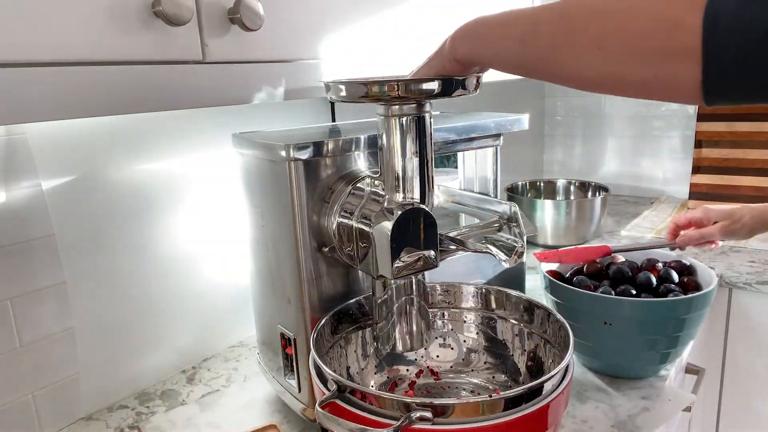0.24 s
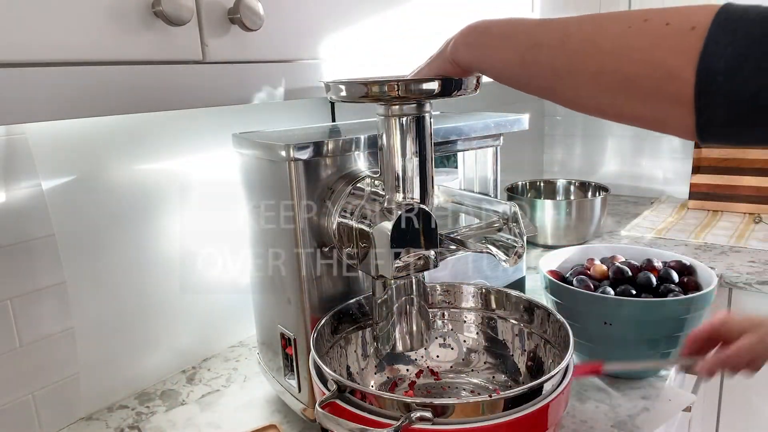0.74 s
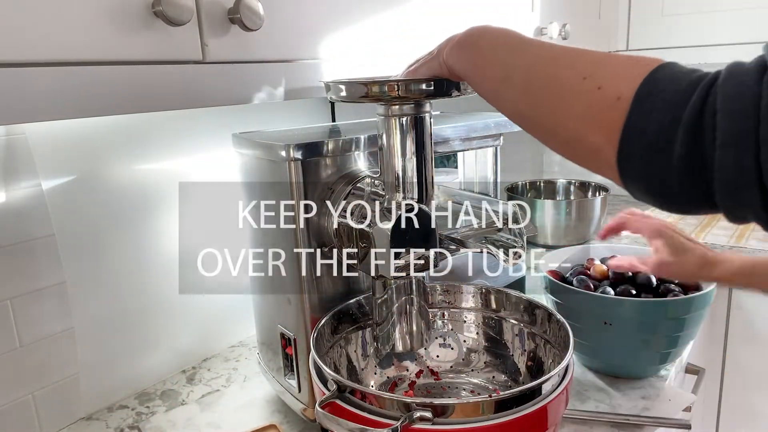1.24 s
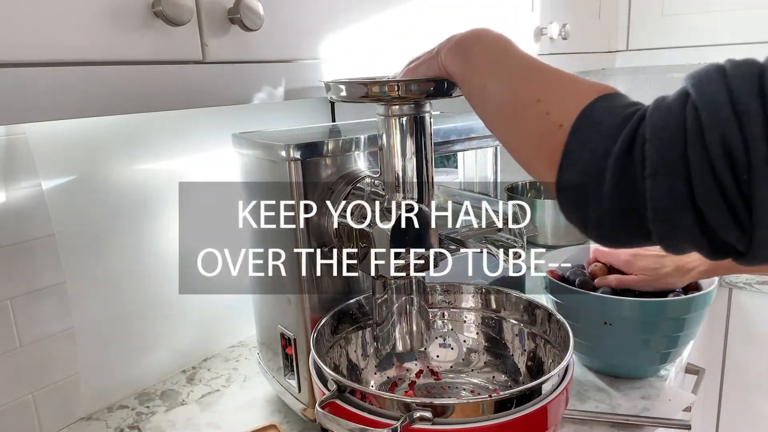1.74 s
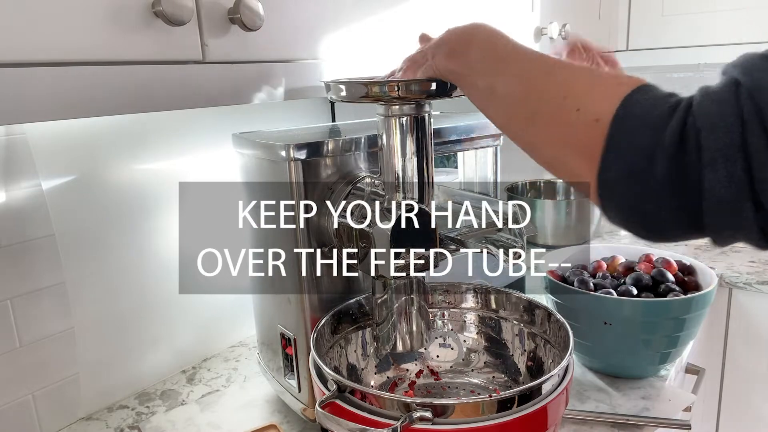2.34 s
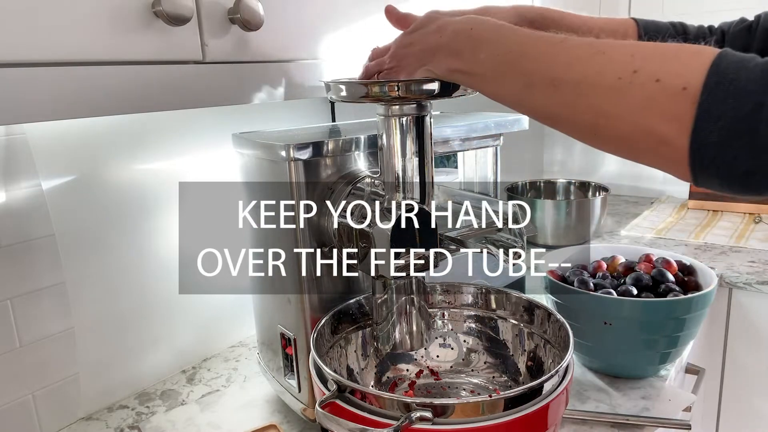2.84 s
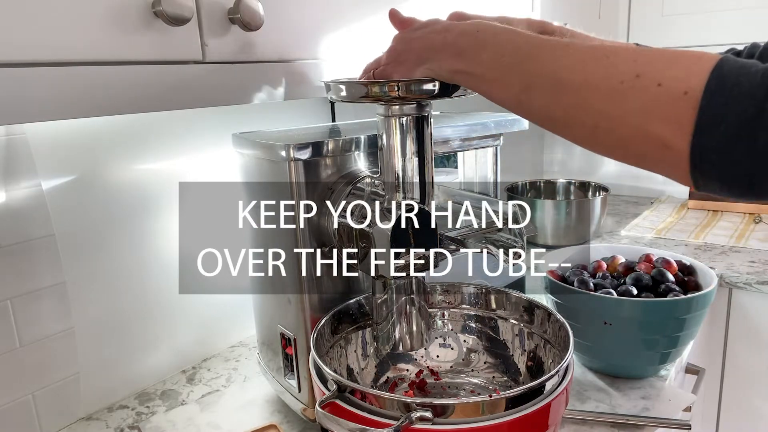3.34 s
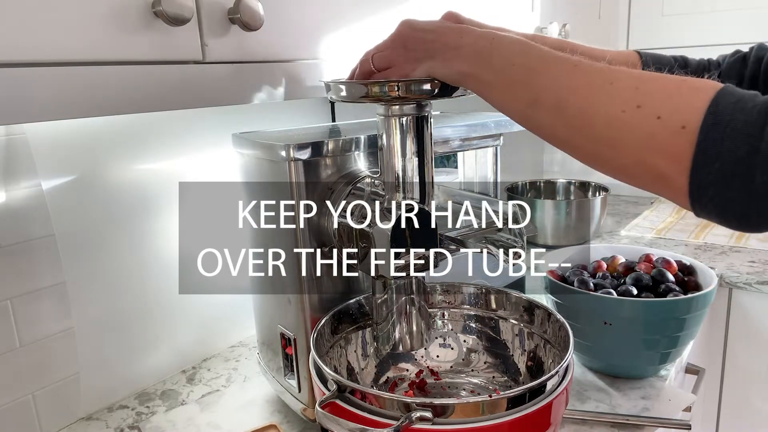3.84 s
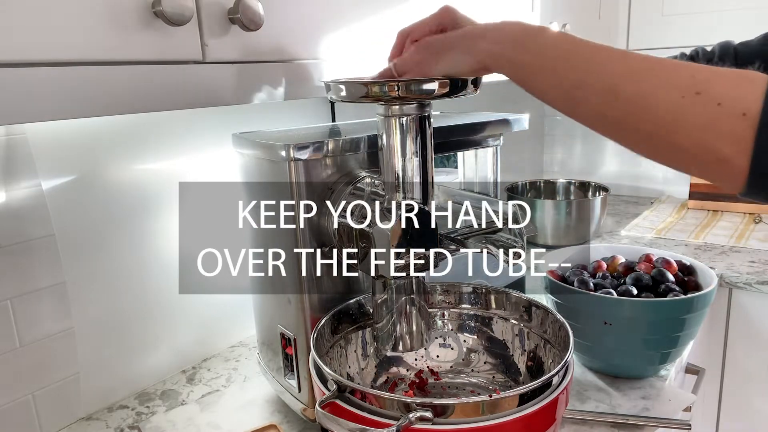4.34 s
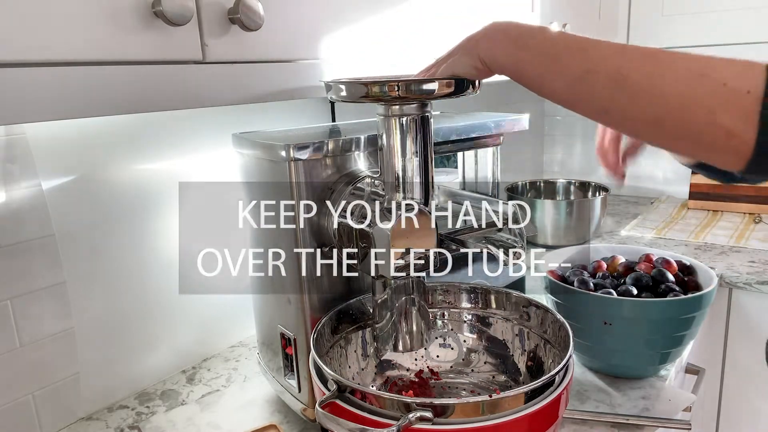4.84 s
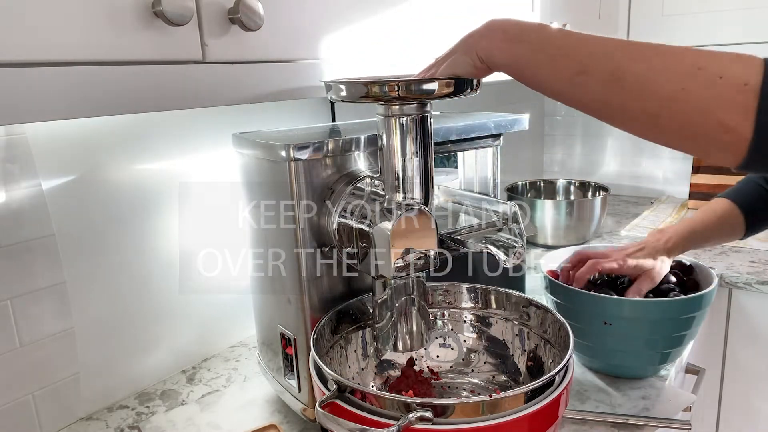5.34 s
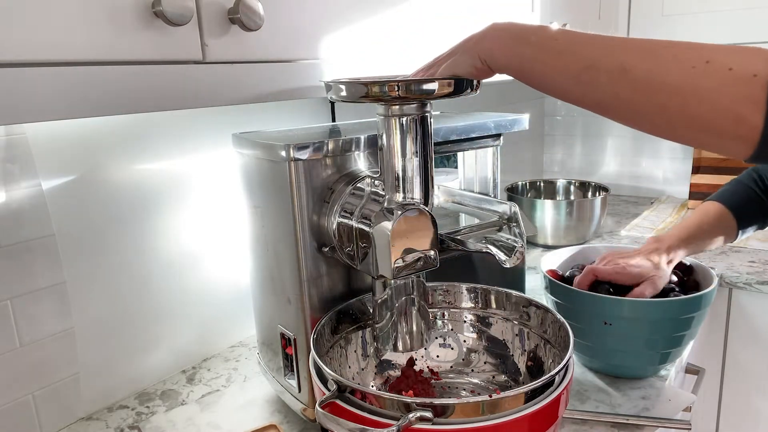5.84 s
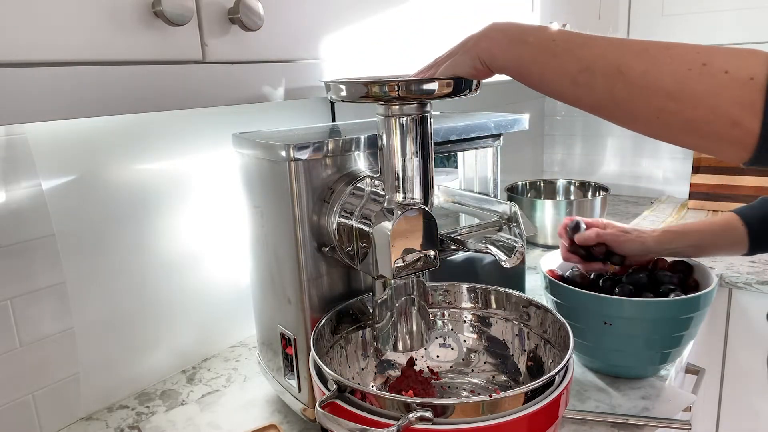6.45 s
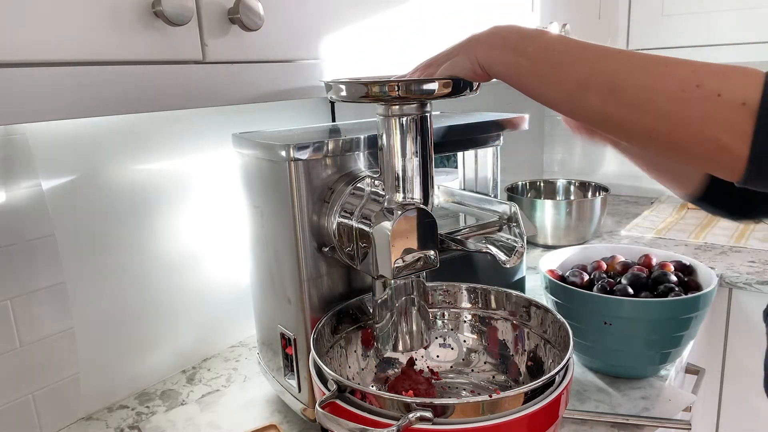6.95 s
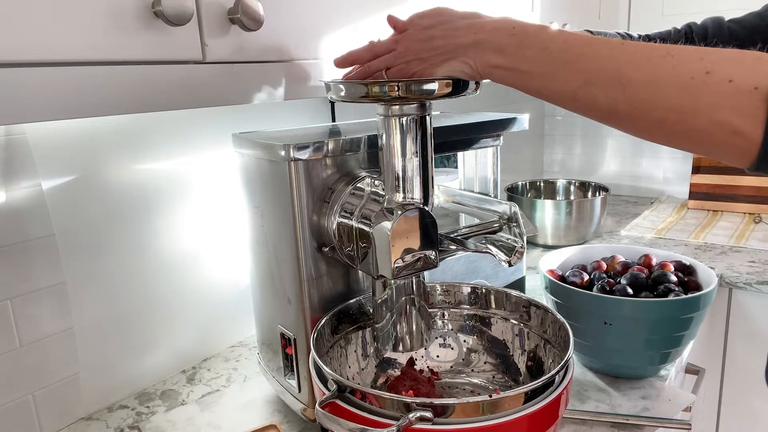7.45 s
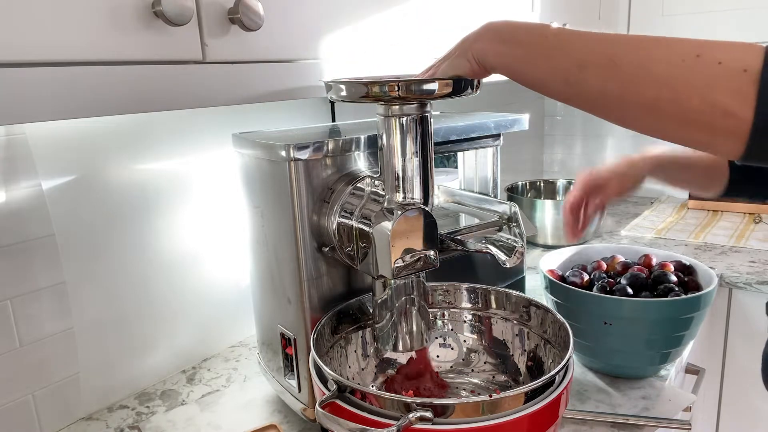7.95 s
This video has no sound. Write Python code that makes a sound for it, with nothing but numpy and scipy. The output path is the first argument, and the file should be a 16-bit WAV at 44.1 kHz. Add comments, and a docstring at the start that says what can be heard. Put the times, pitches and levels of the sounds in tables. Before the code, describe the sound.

A juicer motor runs without stopping for about 8 seconds, heard close up in stereo in a small kitchen: low mains hum, mid-range tones that slowly swell and fade, steady fan hiss and a thin high whine fluttering about fifteen times a second. At 0.1 s a short wet crunch bursts and dies away. At 1.06 s a spatula drops on the counter, a hard slap and clatter with bright handle ringing, then three quicker, weaker bounces until 1.25 s. Only the motor continues until 2.7 s, when berries knock hollowly in the metal tube and crackle, again at 3.0 s. A stronger cluster of knocks, pops and juicy bursts runs from 4.1 to 5.1 s. After a lull, softer crushing spans 5.9 to 6.8 s. From 7.3 s to the end, dense knocks, sharp snaps and crackling overlap, with a short, dull room tail.

```python
"""Juicer crushing berries

Motor orders hum as wavering sines, the fan hisses as coloured noise, a bearing whine pulses 15.5 times a second.
A dropped spatula bounces on the counter: a sagging slap, a noise clatter, ringing blade and handle modes.
Berries knock the hand-covered feed tube as damped sines and snap as coloured clicks.
On the cutter they burst in rushes of random cracks that drive housing, base and open air, with tube tones on top.
A short kitchen tail follows the blows; stereo synthesis mixes two paths, delaying shared treble on the right."""
import sys
import numpy as np
from scipy import signal
from scipy.fft import rfft, irfft, next_fast_len
from scipy.io import wavfile

SR = 44100
rng = np.random.default_rng(int(sys.argv[2]) if len(sys.argv) > 2 else 0)


def transcribe(u):
    """Save the signal u as a 16-bit wav file named by the first command-line argument.

    u: samples, shape (n,) or (channels, n), limited to [-1, 1]; the rate is SR.
    q: integer samples, one column per channel.
    """
    v = np.clip(np.atleast_2d(u).T, -1, 1)
    q = np.round(v * 32767).astype(np.int16)
    wavfile.write(sys.argv[1], SR, q)


N = 361179
SIZE = next_fast_len(N + SR)
BINS_HZ = np.maximum(np.arange(SIZE // 2 + 1) * SR / SIZE, 1)
T_S = np.arange(N) / SR
EVENT_S = np.arange(SR // 2) / SR   # half-second clock of one event


def from_db(db):
    """Decibels to amplitude gain."""
    return 10 ** (np.asarray(db) / 20)


def rms_one(x):
    """Scale to rms 1."""
    return x / np.sqrt(np.mean(x ** 2) + 1e-20)


def in_time(points):
    """Interpolate a (t/s, level/dB) curve at every sample."""
    t_s, level_db = np.transpose(points)
    return np.interp(T_S, t_s, level_db)


def at_hz(points):
    """Interpolate a spectrum over log frequency at every FFT bin."""
    f_hz, value = np.transpose(points)
    return np.interp(np.log(BINS_HZ), np.log(f_hz), value)


def colour(x, spectrum):
    """Minimum-phase filter with the given spectrum, by folding the cepstrum."""
    cepstrum = irfft(np.log(from_db(at_hz(spectrum))), SIZE)
    cepstrum[1:SIZE // 2] *= 2
    cepstrum[SIZE // 2 + 1:] = 0
    response = np.exp(rfft(cepstrum))
    return irfft(rfft(x, SIZE) * response, SIZE)[..., :N]


def drift(rate_hz):
    """Slow random curve of about rms 1: two-pole noise, made at every 40th sample."""
    r = np.exp(-80 * np.pi * rate_hz / SR)
    noise = rng.standard_normal(N // 40 + 2002)
    slow = signal.lfilter([1], [1, -2 * r, r * r], noise)[2000:]   # settled part
    return np.interp(np.arange(N) / 40, np.arange(len(slow)), rms_one(slow - slow.mean()))


def resonance(x, hz, width_hz):
    """Two-pole bandpass, peak gain 1."""
    r = np.exp(-np.pi * width_hz / SR)
    feed = [(1 - r * r) / 2, 0, (r * r - 1) / 2]
    return signal.lfilter(feed, [1, -2 * r * np.cos(2 * np.pi * hz / SR), r * r], x)


def ringing(drive, peaks, patchy_db):
    """Parallel resonances of alternate sign, unevenly fed; levels hold for white noise of rms 1."""
    out = 0
    for k, (hz, width_hz, level_db) in enumerate(peaks):
        feed = from_db(level_db + patchy_db * drift(9.7)) / np.sqrt(np.pi * width_hz / SR)
        out = out + (-1) ** k * resonance(drive * feed + 1e-18, hz, width_hz)
    return out


def strike(events, modes, spread_db):
    """Events (t/s, level/dB) set every mode decaying, each at a randomly spread level."""
    out = np.zeros((2, N))
    for start_s, peak_db in events:
        at = round(start_s * SR)
        for hz, level_db, t60_s in modes:
            start_db = peak_db + level_db + spread_db * rng.standard_normal()
            height = from_db(start_db - 60 * EVENT_S / t60_s)
            out[:, at:at + len(EVENT_S)] += height * np.sin(2 * np.pi * hz * EVENT_S)
    return out


def envelope(peak_db, rise_s, hold_s, t60_s):
    """Half-second envelope: squared-ramp rise, hold, exponential fall."""
    fall_s = np.maximum(EVENT_S - rise_s - hold_s, 0)
    return np.minimum(EVENT_S / rise_s, 1) ** 2 * from_db(peak_db - 60 * fall_s / t60_s)


def add(x, start_s, piece):
    """Add a piece into x from start_s on."""
    at = round(start_s * SR)
    x[..., at:at + piece.shape[-1]] += piece[..., :N - at]


def grains(per_s, spread_db):
    """Random cracks, simultaneous in both paths, with separate sizes and signs; rms 1."""
    born = rng.random(N) < per_s / SR
    sizes = from_db(spread_db * np.minimum(rng.exponential(1, N), 5))
    return rms_one(born * sizes * rng.standard_normal((2, N)))


def tone(hz, level_db, pan_db, lead_rad, waver_db):
    """Stereo sine, wavering in level and phase; pan is left minus right, lead is the right's."""
    turns = hz * T_S + rng.random() + waver_db / 60 * drift(3)
    height = np.sqrt(2) * from_db(level_db + waver_db * drift(15))
    pan = from_db(pan_db * np.array([[.5], [-.5]]))
    return height * pan * np.sin(2 * np.pi * turns + np.array([[0], [lead_rad]]))


# motor tones: f/Hz, rms level/dB, left minus right/dB, right lead/rad
MOTOR_TONES = [(59.9, -40, 2, -.1), (86.1, -57, 4, 0), (119.8, -53, 5, 0), (239.6, -44, 5, .2),
               (300.1, -48, -3, 0), (341.8, -57, 3, -.5), (538.3, -52, 2, .5), (658.8, -49, 4, .1),
               (736.8, -55, -2, -.4), (1065.2, -58, 9, -.8), (1195.8, -58, -3, .2), (1434.6, -52, -4, .2),
               (1553.5, -54, 1, -.4), (1792.6, -60, -3, 0), (2040.3, -64, -5, .2), (3154.5, -68, -2, -1),
               (4240, -66, -2, -2), (4665, -66, -2, -2)]
# swells of four motor tones: t/s, rms level/dB
THIRD_SWELL = [(0, -35), (1.0, -44), (1.9, -35), (2.6, -38), (3.4, -42), (4.8, -37), (5.4, -42.5),
               (6.2, -34), (7.3, -41.5), (8.19, -32)]
LOW_SWELL = [(0, -38), (.9, -52.5), (1.6, -42.5), (2.25, -40.5), (2.5, -33.5), (3.0, -38), (4.1, -38),
             (5.4, -47.5), (6.2, -35.5), (6.9, -43), (7.15, -31.5), (8.19, -55)]
TENTH_SWELL = [(0, -42), (1.1, -41), (1.6, -51.5), (2.6, -40.5), (3.4, -44.5), (5.0, -39), (5.6, -44.5),
               (6.5, -39), (7.1, -44), (8.19, -35)]
HIGH_SWELL = [(0, -45), (.35, -37), (1.6, -41.5), (2.3, -44), (3.2, -38), (5.0, -45.5), (5.5, -79),
              (6.0, -40), (7.1, -45.5), (8.19, -41.5)]


def hum():
    """Mains and rotor orders as sines; the lowest is steadiest, four swell and fade."""
    out = tone(*MOTOR_TONES[0], waver_db=.4)
    for row in MOTOR_TONES[1:]:
        out += tone(*row, waver_db=.8)
    # f/Hz, left minus right/dB, right lead/rad, swell
    swelling = [(478.2, -7, -.3, LOW_SWELL), (956.2, -6, -.8, HIGH_SWELL),
                (179.7, 2, -.1, THIRD_SWELL), (597.5, -6, -.1, TENTH_SWELL)]
    for hz, pan_db, lead_rad, curve in swelling:
        out += tone(hz, in_time(curve), pan_db, lead_rad, waver_db=2)
    return out


ROTOR_HZ, FAN_TRIM_DB = 59.76, -0.5
# motor and fan noise before trim: f/Hz, density/(dB per Hz)
FAN_SPECTRUM = [(45, -83.5), (100, -71.5), (220, -68), (370, -70.5), (480, -68), (850, -66.5),
                (1000, -68.5), (1200, -78), (1600, -72.5), (2200, -80), (4400, -85), (6000, -94.5),
                (8000, -91), (9200, -97.5), (12000, -90), (15500, -99)]


def fan():
    """Air and brush noise, flickering slightly; a part repeats each rotor turn and so sings faint lines."""
    turn_sample = (T_S * ROTOR_HZ % 1 * SR / ROTOR_HZ).astype(int)
    repeating = rng.standard_normal((2, SR))[:, turn_sample]
    noise = rng.standard_normal((2, N)) + .28 * repeating
    gain = np.sqrt(SR / 2) * from_db(FAN_TRIM_DB + drift(21))   # 1 dB flicker
    return gain * colour(noise, FAN_SPECTRUM)


PULSE_HZ, PULSE_START_S, PULSE_T60_S = 15.5, .011, .6
WHINE_HZ, WHINE_WIDTH_HZ, WHINE_RMS_DB = 3401, 170, -52


def bearing():
    """Whine with a side tone three pulse rates away on either hand, plus in-band hiss, pulsing together."""
    since_s = (T_S - PULSE_START_S) % (1 / PULSE_HZ)
    whine = 0
    for k in (-1, 0, 1):
        turns = (WHINE_HZ + 3 * PULSE_HZ * k) * T_S + rng.random((2, 1)) / (2 * np.pi)
        whine = whine + np.sin(2 * np.pi * turns + 2 * np.pi * rng.random((2, 1)))
    hiss = rng.standard_normal((2, N))
    for _ in range(2):
        hiss = resonance(hiss, WHINE_HZ, WHINE_WIDTH_HZ)
    pulse = from_db(-60 * since_s / PULSE_T60_S)
    return from_db(WHINE_RMS_DB) * rms_one((rms_one(whine) + rms_one(hiss)) * pulse)


STRIKE_RISE_S = .001
SLAP_HZ, SLAP_SAG_HZ, SLAP_SAG_S, SLAP_HOLD_S, SLAP_T60_S = 633, 800, 0.0019, 0.0029, 0.0072
CLATTER_DB, CLATTER_T60_S = 7, 0.048
BLADE_DB, RATTLE_LATE_S = -12.5, .007   # re slap level, after slap
# spatula bounces: t/s, slap level/dB, handle level re slap/dB
BOUNCES = [(1.0597, -9.5, -10), (1.1462, -15, -17.5), (1.2014, -23, -25), (1.238, -27.5, -32)]
# counter filter for the clatter: f/Hz, gain/dB
COUNTER_SPECTRUM = [(200, -10), (500, 4.5), (1000, 2), (1800, 3.5), (2700, -12), (3500, -13), (7400, -20.5),
                    (9000, -42), (15500, -40)]
# flexing blade modes: f/Hz, level/dB, t60/s
BLADE_MODES = [(800, -12, 0.06), (1400, 1, 0.032), (1770, 0, .06), (2030, -12, 0.067), (2700, -9, 0.08)]
# steel handle modes: f/Hz, level/dB, t60/s
HANDLE_MODES = [(9965, -10, .1), (10036, 0, .2), (10320, -2, .17), (10450, -12, .12), (10900, -17, .15),
                (11952, -7, .14), (13480, -9, .09), (15450, -11, .08)]


def spatula():
    """Each bounce slaps with a sagging note, clatters as noise, rings the handle, then rattles the blade."""
    push, slap = np.zeros(N), np.zeros((2, N))
    note_hz = SLAP_HZ + SLAP_SAG_HZ * np.exp(-EVENT_S / SLAP_SAG_S)
    note = np.sin(2 * np.pi * np.cumsum(note_hz) / SR)
    for start_s, peak_db, _ in BOUNCES:
        add(push, start_s, envelope(peak_db + CLATTER_DB, STRIKE_RISE_S, 0, CLATTER_T60_S))
        add(slap, start_s, envelope(peak_db, STRIKE_RISE_S, SLAP_HOLD_S, SLAP_T60_S) * note)
    clatter = colour(push * rng.standard_normal((2, N)), COUNTER_SPECTRUM)
    rattles = [(start_s + RATTLE_LATE_S, peak_db + BLADE_DB) for start_s, peak_db, _ in BOUNCES]
    rings = [(start_s, peak_db + ring_db) for start_s, peak_db, ring_db in BOUNCES]
    blade = strike(rattles, BLADE_MODES, spread_db=0)
    handle = strike(rings, HANDLE_MODES, spread_db=4)
    return slap + clatter + blade + handle


KNOCK_RISE_S, KNOCK_ROUGH_RAD = 0.0019, 0.021   # rad: random phase step per sample
KNOCK_HOLD_SHARE, KNOCK_FALL_SHARE = 0.11, 0.55   # hold and t60 re nominal length
# berries knocking the tube wall: t/s, level/dB, f/Hz, nominal length/s
KNOCKS = [(2.715, -31, 1770, .08), (2.737, -11.5, 860, 0.041), (2.749, -12, 475, 0.078),
          (3.01, -35, 2450, 0.093), (3.04, -28, 2510, 0.047), (3.065, -34, 3200, 0.089),
          (3.048, -21, 880, 0.023), (4.153, -6, 566, 0.027), (4.17, -13, 482, 0.12),
          (4.203, -21.5, 946, 0.099), (4.374, -27.5, 1635, 0.053), (4.405, -14, 490, 0.065),
          (4.478, -16, 870, 0.027), (4.51, -6, 882, 0.043), (4.512, -8, 455, 0.039), (4.7, -14, 854, 0.11),
          (4.77, -34, 1370, 0.16), (4.82, -35, 1370, 0.17), (5.087, -26, 857, .06),
          (5.088, -30, 1330, 0.048), (5.942, -19, 471, 0.076), (5.982, -21, 430, .07),
          (6.361, -17.5, 484, 0.14), (6.643, -14.5, 465, 0.052), (6.665, -19, 467, 0.054),
          (7.356, -20.5, 1634, 0.045), (7.364, -8, 897, 0.026), (7.376, -11, 484, 0.088),
          (7.434, -19, 992, 0.053), (7.625, -34, 2050, 0.31), (7.716, -12.5, 897, 0.058),
          (7.783, -13.5, 807, 0.023), (7.936, -16, 810, 0.054)]


def knocks():
    """Each knock rings the tube at once, slightly rough; the ring holds, then the fruit damps it."""
    out = np.zeros((2, N))
    for start_s, peak_db, hz, length_s in KNOCKS:
        wobble_rad = np.cumsum(rng.standard_normal(len(EVENT_S))) * KNOCK_ROUGH_RAD
        height = envelope(peak_db, KNOCK_RISE_S, KNOCK_HOLD_SHARE * length_s, KNOCK_FALL_SHARE * length_s)
        add(out, start_s, height * np.sin(2 * np.pi * hz * EVENT_S + wobble_rad))
    return out


# lone skins or seeds snapping: t/s, click level before filter/dB
POPS = [(.103, -4), (4.647, 2), (4.701, 0), (5.009, 12), (5.985, 10), (6.034, 8), (6.387, 7), (6.787, -4),
        (7.5, 6.5), (7.523, 5), (7.72, 16), (7.901, 17), (7.939, 10), (8.005, 4), (8.105, 8)]
# snap filter: f/Hz, gain/dB
POP_SPECTRUM = [(300, -30), (800, 7.5), (1500, 0), (2500, -13.5), (6000, -51), (15500, -27)]


def pops():
    """Each snap is one filtered click of random sign."""
    clicks = np.zeros((2, N))
    for start_s, peak_db in POPS:
        clicks[:, round(start_s * SR)] = from_db(peak_db) * rng.choice([-1, 1])
    return colour(clicks, POP_SPECTRUM)


def wet_cracks(drive, ring_db):
    """Each crack also rings in one of ten pockets of juice or steel, which open and close."""
    dealt = rng.integers(0, 10, N)
    rings = 0
    for k, hz in enumerate(np.geomspace(1050, 4600, 10)):
        opening = from_db(2.2 * drift(25))
        rings = rings + resonance(drive * (dealt == k) * opening + 1e-18, hz, hz / 38)
    return drive + from_db(ring_db) * rings


BURST_RISE_S, BURST_HOLD_S, BURST_T60_S = .01, 0.015, 0.074
BURST_TUBE_DB, BURST_HOUSING_DB, TUBE_BAND_HZ = -5.5, -11.5, 46
# bursts ringing the tube air: t at end of rise/s, level before path gains/dB, f/Hz
BURSTS = [(0.097, -12.5, 874), (0.102, -20, 1742), (.11, -18, 381), (2.735, -10.5, 555), (2.797, -20, 453),
          (3.035, -11, 423), (3.025, -14.5, 800), (4.159, -12, 470), (4.23, -26, 957), (4.41, -9, 721),
          (4.425, -32, 448), (4.459, -12.5, 870), (4.525, -31, 832), (4.697, -7, 645), (4.718, -8.5, 480),
          (4.779, -19, 852), (4.899, -18, 818), (4.927, -13, 458), (4.989, -19, 830), (4.999, -28, 2530),
          (5.063, -33, 764), (5.932, -21, 458), (5.95, -26, 2470), (5.981, -34, 864), (6.029, -19, 709),
          (6.385, -15, 466), (6.384, -21.5, 2780), (6.54, -21.5, 775), (6.651, -21.5, 1580),
          (6.781, -21, 340), (7.345, -12, 888), (7.39, -16, 457), (7.521, -15, 779), (7.545, -11.5, 494),
          (7.615, -16, 657), (7.702, -7.5, 876), (7.73, -10, 508), (7.754, -21, 885), (7.9, -14, 712),
          (7.933, -14, 518), (8.096, -16.5, 631), (8.163, -18, 483)]


def tube_bursts():
    """Tube-air tones, tuned by fruit and hand, of wandering phase; also the power they put on the housing."""
    tube, housing_power = np.zeros((2, N)), np.zeros(N)
    step_rad = np.sqrt(2 * np.pi * TUBE_BAND_HZ / SR)
    for crest_s, peak_db, hz in BURSTS:
        start_s = crest_s - BURST_RISE_S
        burst = envelope(peak_db, BURST_RISE_S, BURST_HOLD_S, BURST_T60_S)
        wander_rad = np.cumsum(rng.standard_normal((2, SR // 2)), axis=1) * step_rad
        note = np.sin(2 * np.pi * hz * EVENT_S + wander_rad)
        add(tube, start_s, from_db(BURST_TUBE_DB) * burst * note)
        add(housing_power, start_s, (from_db(BURST_HOUSING_DB) * burst) ** 2)
    return tube, housing_power


BASE_LAG_S, SPLIT_HZ = 0.013, 5000   # heavy base responds late; spray lies above the split
# berries ground up: t/s, rise/s, hold/s, t60/s,
# crack force on housing/dB, on base/dB, on open air/dB, spray re air/dB
CRUSHES = [(0.077, 0.019, 0.0046, 0.3, -27, -22.5, -16, 4.5),
           (2.695, 0.027, 0.016, 0.4, -24.5, -22.5, -14, -1),
           (2.986, 0.021, 0.031, 0.36, -25.5, -25, -20, 0.5), (4.13, 0.019, 0.012, 0.29, -15, -22, -11, -1),
           (4.356, 0.044, 0.012, 0.42, -18.5, -19.5, -13, -3), (4.48, 0.023, 0.021, 0.2, -19, -22, -15, -1),
           (4.632, .008, 0.0071, 0.1, -21.5, -29, -37, 9), (4.654, 0.038, 0.012, 0.52, -22, -21, -17, 2.5),
           (4.876, 0.076, 0.038, 0.62, -20.5, -22.5, -18, -2.5),
           (5.883, 0.058, 0.063, 0.62, -21.5, -21, -19, -2), (6.245, 0.073, 0.03, 0.2, -25, -19, -29, 2),
           (6.329, 0.036, 0.014, 1, -22, -20.5, -18.5, -3), (6.572, 0.048, 0.12, 0.98, -25, -26, -22, -0.5),
           (7.329, 0.025, 0.015, 0.3, -18.5, -21.5, -12, -2),
           (7.418, 0.13, 0.075, 0.7, -22.5, -22.5, -21, -10),
           (7.646, 0.039, 0.018, 0.45, -22, -19, -14.5, -6),
           (7.876, 0.016, 0.031, 0.77, -22, -23.5, -20.5, -1),
           (8.02, 0.064, 0.089, .5, -24, -24.5, -19, -9)]
# housing resonances: f/Hz, width/Hz, level/dB
HOUSING_PEAKS = [(426, 135, -1.5), (475, 75, -1), (654, 72, -6), (807, 30, -8), (870, 29, -6),
                 (967, 86, -8), (1223, 115, -11), (1370, 130, -13.5), (1580, 33, -18)]
# base resonances: f/Hz, width/Hz, level/dB
BASE_PEAKS = [(176, 14.3, -8.5), (241.3, 11.7, -9), (343, 25, -12)]
# open-air crackle filter: f/Hz, gain/dB
CRACKLE_SPECTRUM = [(600, -32), (1100, 1.5), (1600, -9), (2150, -7.5), (2700, -5.5), (3100, -11),
                    (4200, -9.5), (6000, -15.5), (8000, -15), (11000, -14), (15500, -25)]


def berries():
    """Dense cracks drive housing, base and open air, over the tube tones; powers of all berries add."""
    cracks = grains(per_s=900, spread_db=3.5)
    power = np.zeros((4, N))   # housing, base, air, spray
    for start_s, rise_s, hold_s, t60_s, housing_db, base_db, air_db, spray_db in CRUSHES:
        path_gain = from_db([[housing_db], [base_db], [air_db], [air_db + spray_db]])
        add(power, start_s, (path_gain * envelope(0, rise_s, hold_s, t60_s)) ** 2)
    tube, burst_power = tube_bursts()
    power[0] += burst_power
    keep = np.exp(-1 / (BASE_LAG_S * SR))
    power[1] = signal.lfilter([1 - keep], [1, -keep], power[1])
    push, shake, snap, spit = np.sqrt(power)
    boom = tube + ringing(push * cracks, HOUSING_PEAKS, patchy_db=1.5)
    thud = ringing(shake * cracks, BASE_PEAKS, patchy_db=0)
    snaps = snap * from_db(1.5 * drift(30)) * grains(per_s=3000, spread_db=2.5)
    crackle = colour(wet_cracks(snaps, ring_db=6), CRACKLE_SPECTRUM)
    spray = signal.sosfilt(signal.butter(2, SPLIT_HZ, "high", fs=SR, output="sos"), crackle)
    return boom + thud + crackle + (spit / (snap + 1e-9) - 1) * spray


KITCHEN_T60_S, KITCHEN_RISE_S, KITCHEN_DB = 0.18, 0.0062, -8.5


def kitchen(x):
    """Short, dull diffuse tail: convolution with decaying noise, separate for each path."""
    tail = rng.standard_normal((2, len(EVENT_S))) * from_db(-60 * EVENT_S / KITCHEN_T60_S)
    tail *= np.minimum(EVENT_S / KITCHEN_RISE_S, 1)
    tail = signal.lfilter([1], [1, -.6], tail)
    tail /= np.sqrt(np.sum(tail ** 2, axis=1, keepdims=True))
    return from_db(KITCHEN_DB) * signal.fftconvolve(x, tail, axes=1)[:, :N]


LAG_FROM_HZ, LAG_TURN_HZ = 6400, 5600   # above the first, right lags one more cycle per LAG_TURN_HZ
# share of the left path in the right channel: f/Hz, share/(-1 to 1)
LIKENESS = [(60, .99), (130, .97), (230, .93), (400, .68), (800, .42), (1500, .42), (2700, .05),
            (4500, -.3), (5800, .1), (7500, .7), (8800, .995), (16000, .995)]
# channel balance: f/Hz, left minus right/dB
BALANCE = [(60, 27), (120, -6.5), (260, 9), (340, 0), (600, 0), (1500, -0.5), (5000, -2.5), (8000, 7.5),
           (16000, -2)]


def stereo(paths):
    """Stereo synthesis: right takes part of the left, delayed in the treble, plus part of the second path."""
    left, other = rfft(paths, SIZE)
    alike = np.clip(at_hz(LIKENESS), -1, 1)
    lag_turns = np.maximum(BINS_HZ - LAG_FROM_HZ, 0) / LAG_TURN_HZ
    right = alike * np.exp(-2j * np.pi * lag_turns) * left + np.sqrt(1 - alike ** 2) * other
    tilt = from_db(at_hz(BALANCE) / 2)
    return irfft(np.array([left * tilt, right / tilt]), SIZE)[:, :N]


def scene():
    """Motor, spatula and fruit in the kitchen; all blows are cut below 135 Hz (small housing)."""
    blows = spatula() + knocks() + pops() + berries()
    hits = signal.sosfilt(signal.butter(4, 135, "high", fs=SR, output="sos"), blows)
    return hum() + stereo(fan() + bearing() + hits + kitchen(hits))


def record(dry):
    """Round peaks by tanh; cut rumble below 45 Hz and treble above 15.75 kHz."""
    rounded = np.tanh(dry)
    no_rumble = signal.sosfilt(signal.butter(4, 45, "high", fs=SR, output="sos"), rounded)
    return signal.sosfilt(signal.ellip(12, .5, 80, 15750, fs=SR, output="sos"), no_rumble)


dry = scene()
out = record(dry)
transcribe(out)
```